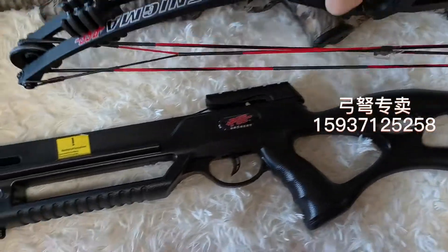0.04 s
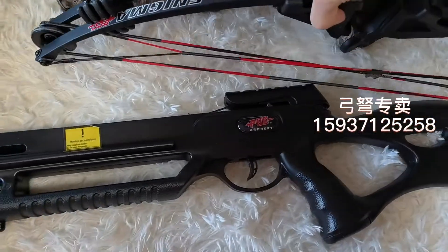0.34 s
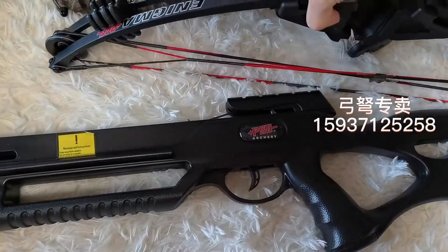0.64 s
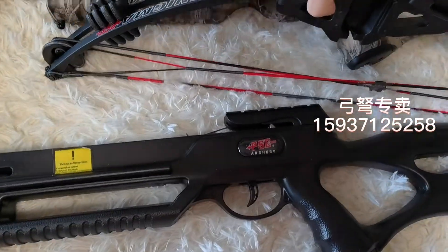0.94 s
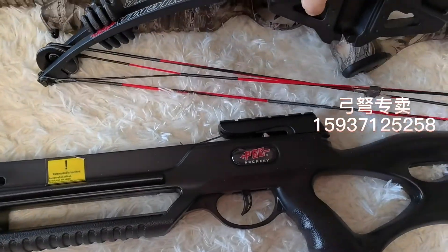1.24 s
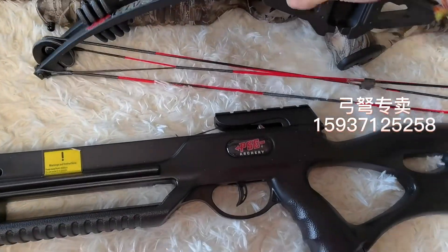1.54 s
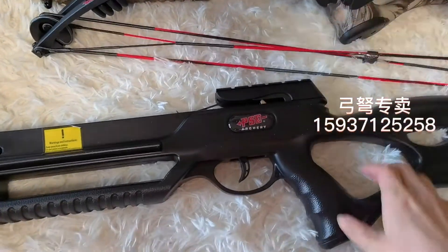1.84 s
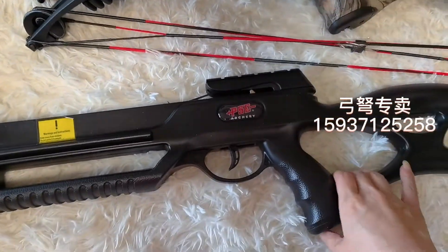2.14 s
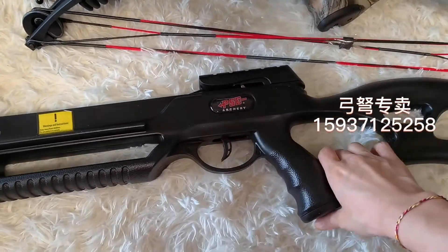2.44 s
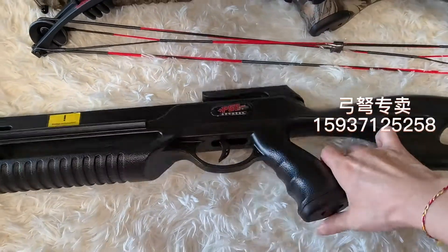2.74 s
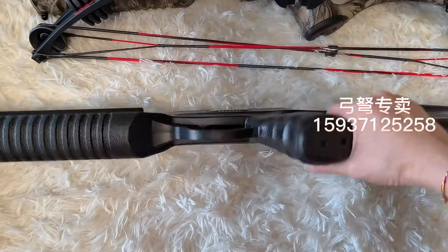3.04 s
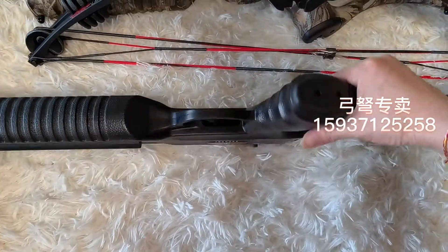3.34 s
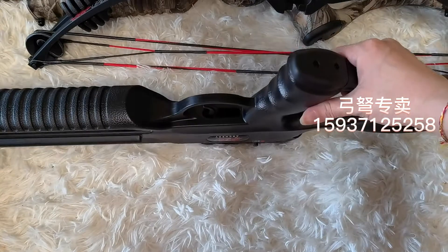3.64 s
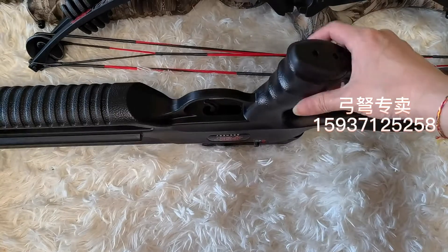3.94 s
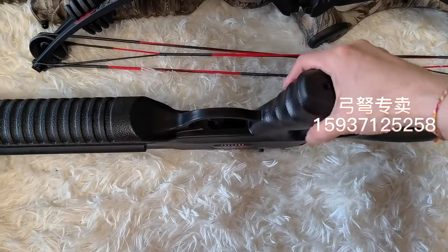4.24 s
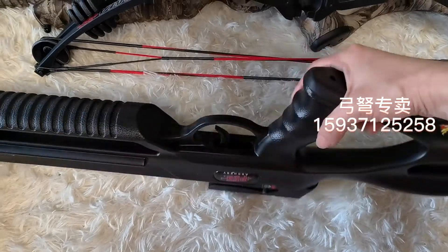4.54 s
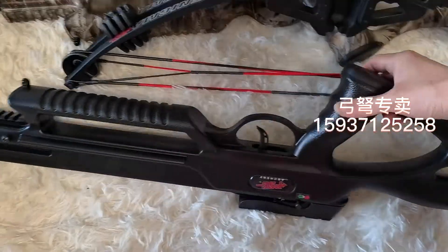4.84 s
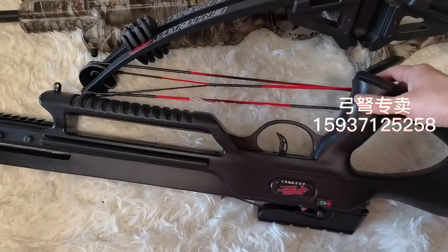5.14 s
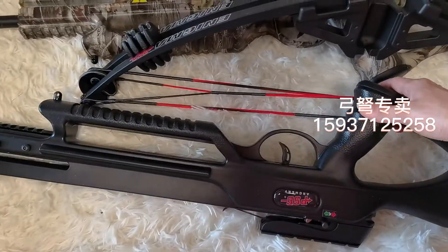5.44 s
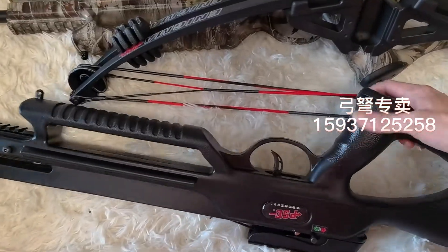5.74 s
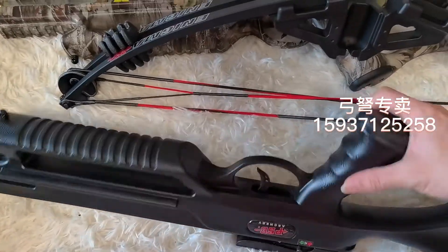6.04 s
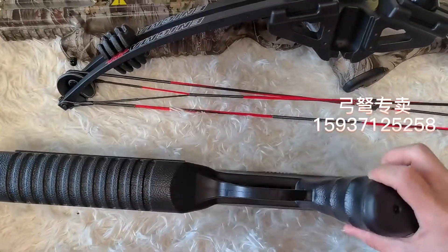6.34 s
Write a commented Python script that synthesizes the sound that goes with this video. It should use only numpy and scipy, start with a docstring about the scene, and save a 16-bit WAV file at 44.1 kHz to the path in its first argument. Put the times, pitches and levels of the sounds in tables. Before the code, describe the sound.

Crossbows handled on a soft rug in a quiet room, with dull thuds, small plastic and metal clicks and faint rubbing.

```python
"""Two crossbows are handled on a deep rug in a quiet room that hums faintly throughout.
0-1.3 s: a faint echo dies away; the far one is lowered and let go, its stock thuds, loose fittings click.
From 1.9 s: the near one is gripped; fittings click and buzz, hand and pile brush the plastic.
4.6-5.3 s: it is rolled over and laid on its other side with more thuds. Last rubs end near 6.4 s."""
import sys
import numpy as np
from scipy import signal
from scipy.fft import rfft, irfft, next_fast_len
from scipy.io import wavfile

SR = 44100
rng = np.random.default_rng(int(sys.argv[2]) if len(sys.argv) > 2 else 0)


def int16_out(signal):
    """Quantize to a 16-bit WAV file."""
    q = np.round(np.clip(np.atleast_2d(signal).T, -1, 1) * 32767)
    wavfile.write(sys.argv[1], SR, q.astype(np.int16))


N = 282237


def from_db(db):
    """Decibels to gain."""
    return 10 ** (np.asarray(db) / 20)


def unit_energy(x):
    """Scale to a mean energy of one per channel."""
    return x / np.sqrt(np.mean(np.sum(x ** 2, axis=-1)) + 1e-20)


def at_hz(points, hz):
    """Interpolate a table on a log-frequency axis."""
    knots_hz, values = np.array(points).T
    return np.interp(np.log(hz + 1), np.log(knots_hz), values)


def band(x, low_hz, high_hz):
    """Band-pass with second-order slopes."""
    edges_hz = np.clip([low_hz, high_hz], 10, [SR / 2 - 2000, SR / 2 - 1000]) + [0, 1]
    return signal.sosfilt(signal.butter(2, edges_hz, "band", fs=SR, output="sos"), x)


def resonate(x, hz, width_hz):
    """Two-pole resonance, unity peak gain."""
    radius = np.exp(-np.pi * width_hz / SR)
    feedback = [1, -2 * radius * np.cos(2 * np.pi * hz / SR), radius ** 2]
    return signal.lfilter(np.array([1, 0, -1]) * (1 - radius ** 2) / 2, feedback, x)


def resonances(x, table):
    """Parallel resonances, each passed twice for steep skirts."""
    return sum(from_db(db) * resonate(resonate(x, hz, width_hz), hz, width_hz)
               for hz, width_hz, db in table)


def ring(modes, t):
    """Struck modes as decaying sines."""
    return sum(from_db(db - 60 * t / t60_s) * np.sin(2 * np.pi * hz * t) for hz, db, t60_s in modes)


def noise(spectrum, size):
    """Diffuse coloured stereo noise, most alike left and right in the bass; rms 1."""
    # left-right likeness: freq_hz, correlation
    likeness = [(60, 1), (120, 0.37), (280, 0.97), (550, 0.33), (1100, 0.19), (4000, 0.0027), (12000, 0.12)]
    padded = next_fast_len(size)
    hz = np.fft.rfftfreq(padded, 1 / SR)
    mid, side = rfft(rng.standard_normal((2, padded))) * from_db(at_hz(spectrum, hz))
    alike = at_hz(likeness, hz)
    left_right = np.sqrt(1 + alike) * mid + np.sqrt(1 - alike) * side * [[1], [-1]]
    out = irfft(left_right, padded)[:, :size]
    return out / out.std()


def flutter(per_s):
    """Straight lines between random knots of unit spread."""
    position = np.arange(N) * per_s / SR
    count = int(position[-1]) + 2
    return np.interp(position, np.arange(count), rng.standard_normal(count))


def add(out, start_s, sound):
    """Mix a sound in at its time."""
    start = round(start_s * SR)
    out[..., start:start + sound.shape[-1]] += sound[..., :N - start]


def room_tone(air_db=-62.5):
    """A low rush of air with a wavering drone of room resonances."""
    # steady noise: freq_hz, density_db
    air = [(25, -26), (45, -1.5), (70, -5.5), (100, 3), (150, -7.5), (220, -7.5), (320, -16.5), (500, -21),
           (900, -27), (1500, -34), (3000, -45.5), (6000, -49), (15000, -51.5)]
    # room resonances: pitch_hz, width_hz, level_db
    drones = [(100.3, 9.6, -64.5), (120.25, 6.24, -60)]
    out = from_db(air_db) * noise(air, N)
    for hz, width_hz, db in drones:
        narrow = resonate(rng.standard_normal(N + SR), hz, width_hz)
        drone = resonate(narrow, hz, 2 * width_hz)[SR:]  # skip the build-up
        out += from_db(db) * drone / drone.std()
    return out


def thuds(events, modes, clatter_t60_s=0.33):
    """One band of modes and dense clatter swells and dies away, as when a stock lands on the rug."""
    # the stock's many small overlapping modes: freq_hz, density_db
    dense_modes = [(40, -6.5), (120, 10), (220, -0.5), (410, -7.5), (560, -17), (750, -20), (1040, -20.5),
                   (1200, -27.5), (5000, -45)]
    out, t = np.zeros((2, N)), np.arange(SR) / SR
    body = unit_energy(ring(modes, t))
    for start_s, db, low_hz, high_hz, rise_s, clatter_db in events:
        clatter = unit_energy(noise(dense_modes, SR) * from_db(-60 * t / clatter_t60_s))
        onset = 1 - np.exp(-(t / rise_s) ** 2)
        ringing = (body + from_db(clatter_db) * clatter) * onset
        add(out, start_s, from_db(db) * unit_energy(band(ringing, low_hz, high_hz)))
    return out


def clicks(releases, shell_resonances, metal_modes, spread=0.87, snap_db=13.0):
    """A fitting lets go: one snap and a burst of catches sound the plastic shell; the metal rings."""
    out, t = np.zeros((2, N)), np.arange(SR // 2) / SR
    metal = unit_energy(ring(metal_modes, t))
    snap = from_db(snap_db) * (t == 0)
    for start_s, db, decay_s, low_hz, high_hz, ring_db in releases:
        mid, side = rng.standard_normal((2, len(t))) * np.exp(-t / decay_s) + 1e-18
        force = snap + mid + spread * side * np.array([[1], [-1]])
        shell = unit_energy(resonances(force, shell_resonances))
        click = band(shell + from_db(ring_db) * metal, low_hz, high_hz)
        add(out, start_s, from_db(db) * unit_energy(click))
    return out


def room(x, wet_db=-7.5, build_s=0.002, low_t60_s=0.26, treble_t60_s=0.18, split_hz=9800):
    """Direct sound plus dense reflections, different at each ear; rug and air take the treble first."""
    t = np.arange(SR // 2) / SR
    white = rng.standard_normal((2, len(t)))
    low = signal.sosfiltfilt(signal.butter(2, split_hz, fs=SR, output="sos"), white)
    tail = low * from_db(-60 * t / low_t60_s) + (white - low) * from_db(-60 * t / treble_t60_s)
    response = unit_energy(tail * (1 - np.exp(-t / build_s)))
    return x + from_db(wet_db) * signal.fftconvolve(x, response, axes=-1)[:, :N]


def far_crossbow(dry_share=0.5):
    """A faint echo, then thuds and clicks; the rug keeps a share of the clicks out of the room."""
    # first row a faint mid-pitched room echo dying away, the rest thuds of the stock:
    # start_s, energy_db, low_hz, high_hz, rise_s, clatter_db
    echo_and_thuds = [(0.0, -30.5, 444, 795, 0.0028, 13), (0.174, 0, 43.7, 75.7, 0.054, -1),
                      (0.200, -15.5, 130, 468, 0.082, 6), (0.318, -15.5, 98, 249, 0.012, 12),
                      (0.395, -19, 81, 203.4, 0.0047, -9), (1.093, -6, 110, 440, 0.0058, -6),
                      (1.228, -15, 105, 141, 0.0066, -10)]
    # stock modes: pitch_hz, level_db, t60_s
    stock = [(61.2, -2.5, 0.5), (95, -18.5, 0.15), (115.6, -1, 0.68), (186.3, 5, 0.33), (216.5, -5.5, 0.44),
             (325, -17, 0.21), (374, -11.5, 0.34), (484, -16.5, 0.6), (521, -3.5, 0.097),
             (790, -9.5, 0.084)]
    # fittings letting go: start_s, energy_db, decay_s, low_hz, high_hz, ring_db
    releases = [(0.3150, -53, .002, 7000, 12000, -5), (0.3255, -37, 0.003, 2980, 9000, -3),
                (0.3290, -31, 0.016, 1200, 4200, -11)]
    # plastic shell resonances: centre_hz, width_hz, gain_db
    shell = [(1400, 630, 2.5), (2500, 1000, 2), (3170, 1400, -5), (5370, 1600, -6), (8250, 1600, -8)]
    # metal fitting modes: pitch_hz, level_db, t60_s
    metal = [(1390, 0, 0.16), (3650, -11, 0.11), (5250, -1, 0.082), (7100, -2, 0.097)]
    fittings = clicks(releases, shell, metal)
    return thuds(echo_and_thuds, stock) + dry_share * fittings + (1 - dry_share) * room(fittings)


def near_crossbow():
    """Gripped, rolled over and laid down: fittings click and buzz into the room, the stock thuds."""
    # fittings letting go: start_s, energy_db, decay_s, low_hz, high_hz, ring_db
    releases = [(1.8728, -44.5, 0.0087, 750, 1940, -19), (2.5005, -23, 0.0042, 7040, 16000, -25),
                (2.51, -32.5, 0.022, 1500, 15000, -21), (2.523, -22, 0.0043, 1970, 14500, -22),
                (2.7473, -45.5, 0.0011, 4500, 11500, -22), (2.8398, -18.5, 0.0014, 1980, 10500, -27.5),
                (4.611, -48.5, 0.0046, 1490, 7000, -28), (4.656, -39.5, 0.035, 1303, 5000, -11.5),
                (4.706, -44, 0.03, 1200, 3780, -19), (4.7690, -42.5, 0.017, 1080, 7200, -15.5),
                (6.199, -38, 0.011, 1400, 5170, -8.5)]
    # plastic shell resonances: centre_hz, width_hz, gain_db
    shell = [(1200, 1100, -1.5), (2235, 450, -3), (4320, 3300, -2.5), (5760, 1100, -8), (7750, 2040, 3.5),
             (9000, 4400, -10.5), (11670, 1900, -5.5), (15000, 2000, -0.5)]
    # metal fitting modes: pitch_hz, level_db, t60_s
    metal = [(1410, -2, 0.088), (2020, -6.5, .15), (2330, -2, .07), (2670, -8.5, .07), (2890, -6.5, .07),
             (3890, -13, .08)]
    # stock landings: start_s, energy_db, low_hz, high_hz, rise_s, clatter_db
    landings = [(4.603, 13.5, 45.4, 103, 0.003, -4), (4.609, -32.5, 602, 1400, 0.0028, 14.5),
                (4.650, -16.5, 262, 980, 0.033, 8), (4.690, 1.5, 43.6, 84.4, 0.0088, 0.5),
                (5.111, -4, 147.4, 1040, 0.0029, -6.5), (5.166, -1.5, 95, 159.3, 0.0013, -8.5),
                (5.236, -4, 95, 162.4, 0.013, -8), (5.292, -10.5, 98, 143, 0.023, -10.5)]
    # stock modes: pitch_hz, level_db, t60_s
    stock = [(50.6, -1, 0.35), (70.1, 6.5, 0.26), (106.8, 9, 0.27), (178, -6.5, 0.53), (241.8, -8.5, 0.42),
             (353.5, -10, 0.13), (402, -8, 0.3), (439, -14, 0.34), (538, -17, 0.26), (750, -23.5, 0.1),
             (943, -19.5, 0.23), (980, -20, 0.13)]
    return thuds(landings, stock) + room(clicks(releases, shell, metal) + buzzes())


def buzzes(decay_s=0.06, width_share=0.13):
    """After a touch, a loose part chatters in one narrow resonance and dies away."""
    # loose parts: start_s, energy_db, pitch_hz
    parts = [(1.874, -43.5, 1940), (2.03, -49.5, 1920), (4.68, -42.5, 2154), (4.755, -42.5, 2500),
             (4.76, -47.5, 5060), (5.113, -57, 3175), (5.224, -58, 3060)]
    out, t = np.zeros((2, N)), np.arange(SR // 2) / SR
    for start_s, db, hz in parts:
        chatter = rng.standard_normal((2, len(t))) * np.exp(-t / decay_s)
        buzz = resonances(chatter, [(hz, width_share * hz, 0)])
        add(out, start_s, from_db(db) * unit_energy(buzz))
    return out


def rubbing(swell_share=0.6, release_s=0.12, rasp_width_hz=600, grain_db=2.0, catches_per_s=120):
    """Skin drags dully over the stock in small uneven catches; a firm grip adds a hollow rasp."""
    # hand strokes: start_s, end_s, drag_db, rasp_db, rasp_hz
    strokes = [(2.079, 2.834, -74, -92, 1620), (2.583, 2.721, -70, -74.5, 1990),
               (2.80, 3.06, -76.5, -74, 1290), (3.45, 4.586, -81, -87.5, 1710),
               (5.52, 5.648, -76, -73.5, 1450), (5.866, 5.966, -79.5, -76.5, 1420),
               (6.06, 6.374, -77, -69.5, 1900)]
    # skin drag colour: freq_hz, density_db
    skin = [(300, -4.5), (500, 0.5), (950, 2.5), (1600, -1), (2200, -4.5), (3500, -19), (5000, -30),
            (9000, -24)]
    # upper stock resonances, relative to the rasp's own: centre_hz, width_hz, gain_db
    hollow = [(2455, 260, -7), (3220, 570, -9.5), (4120, 240, -16), (7400, 2500, -21)]
    out, t = np.zeros((2, N)), np.arange(2 * SR) / SR
    for start_s, end_s, drag_db, rasp_db, rasp_hz in strokes:
        length_s = end_s - start_s
        swell = np.minimum(t / (swell_share * length_s), 1)
        fade = np.exp(-np.maximum(t - length_s, 0) / release_s)
        rasp = resonances(rng.standard_normal((2, len(t))), [(rasp_hz, rasp_width_hz, 0), *hollow])
        drag = from_db(drag_db) * noise(skin, len(t))
        add(out, start_s, swell * fade * (drag + from_db(rasp_db) * rasp / rasp.std()))
    return out * from_db(grain_db * flutter(catches_per_s))


def swishes(grain_db=2.0, tufts_per_s=220):
    """Tufts of pile sweep over the stock with a bright, uneven hiss."""
    # pile sweeps: middle_s, half_length_s, level_db
    sweeps = [(2.543, 0.056, -67), (2.716, 0.046, -76.5), (2.861, 0.077, -68.5), (4.139, 0.042, -80),
              (4.693, 0.043, -89.5), (4.787, 0.055, -69.5), (4.974, 0.045, -82.5), (5.749, 0.046, -78.5),
              (6.312, 0.33, -101)]
    # pile hiss colour: freq_hz, density_db
    pile = [(2000, -17.5), (4500, -5.5), (6300, -7), (8200, 0), (10500, -12), (15000, -15)]
    t = np.arange(N) / SR
    envelope = sum(from_db(db) * np.exp(-((t - middle_s) / half_s) ** 2)
                   for middle_s, half_s, db in sweeps)
    return envelope * noise(pile, N) * from_db(grain_db * flutter(tufts_per_s))


def scene():
    """Both crossbows, hand, pile and room tone."""
    return far_crossbow() + near_crossbow() + rubbing() + swishes() + room_tone()


def record(dry):
    """Steep low-pass."""
    cutoff_hz = 15650
    return signal.sosfilt(signal.ellip(10, 0.2, 80, cutoff_hz, fs=SR, output="sos"), dry)


dry = scene()
out = record(dry)
int16_out(out)
```